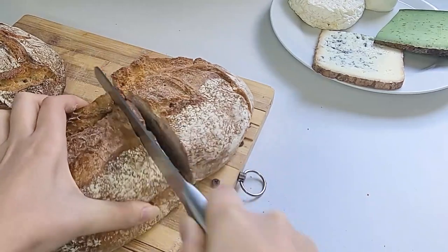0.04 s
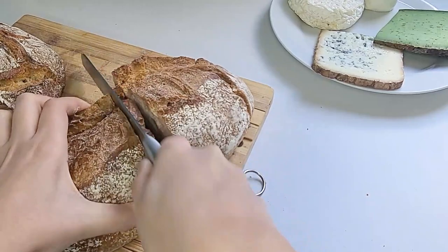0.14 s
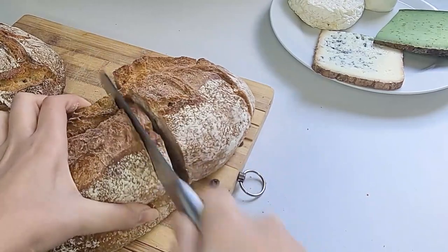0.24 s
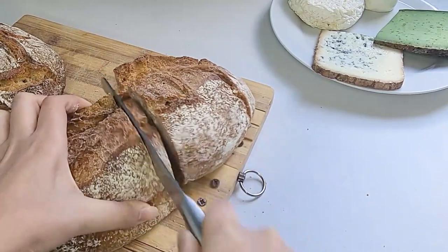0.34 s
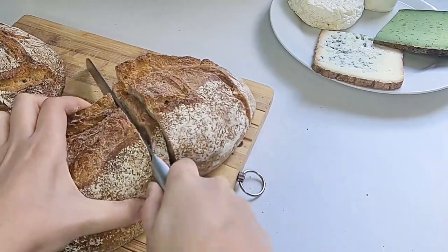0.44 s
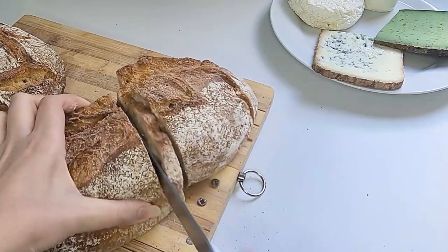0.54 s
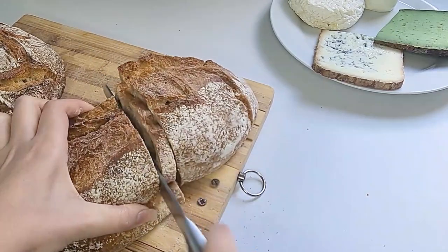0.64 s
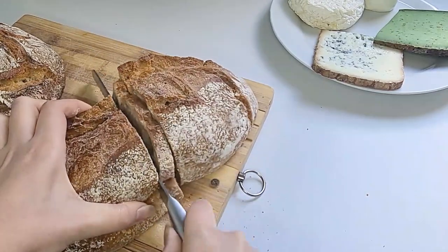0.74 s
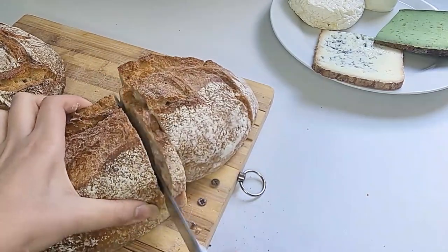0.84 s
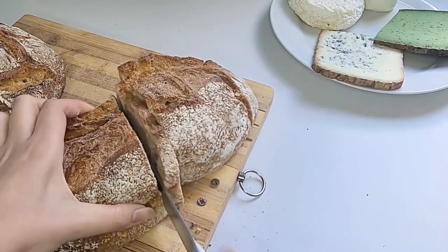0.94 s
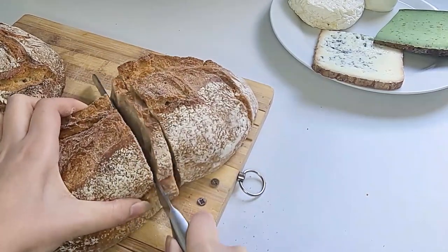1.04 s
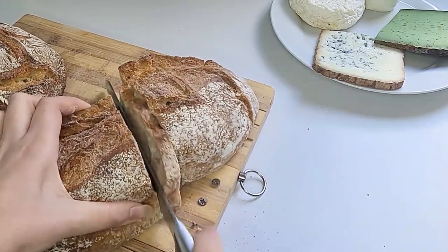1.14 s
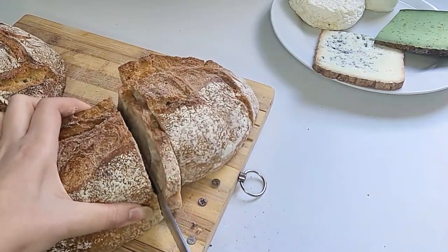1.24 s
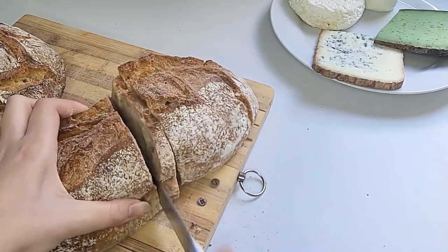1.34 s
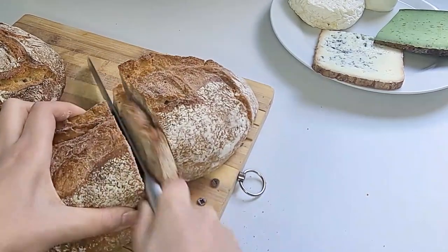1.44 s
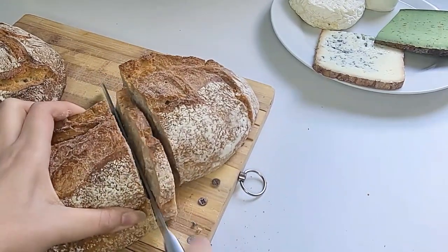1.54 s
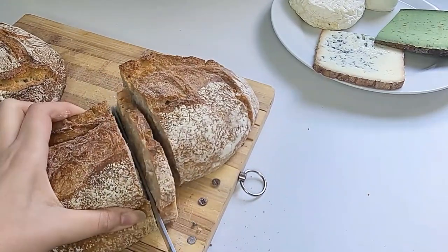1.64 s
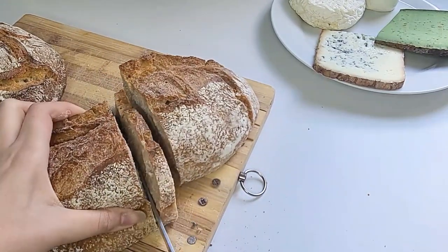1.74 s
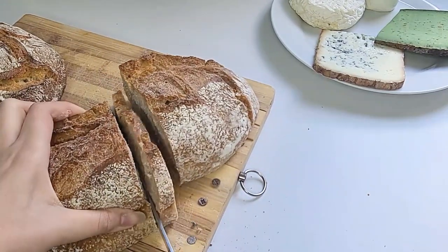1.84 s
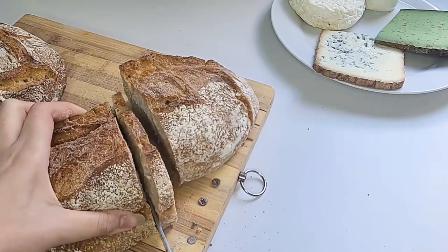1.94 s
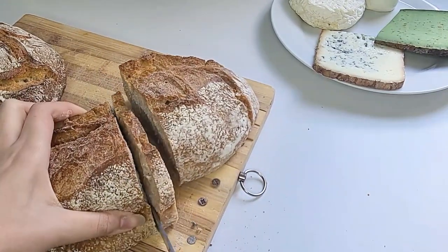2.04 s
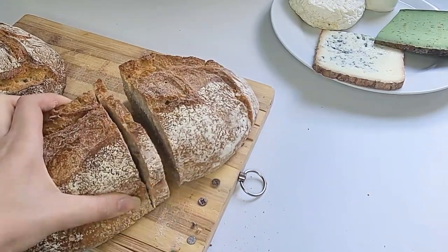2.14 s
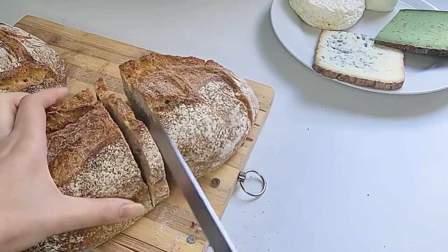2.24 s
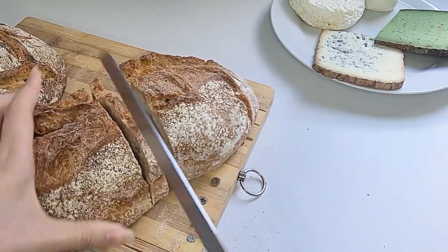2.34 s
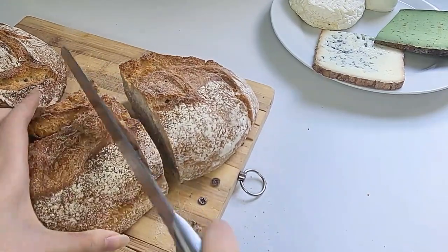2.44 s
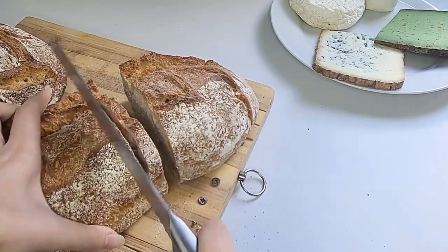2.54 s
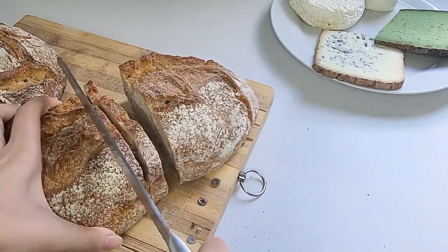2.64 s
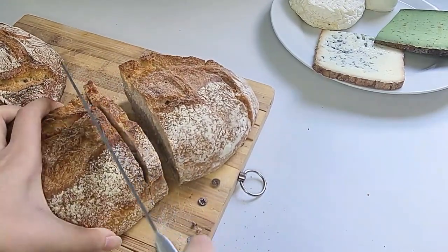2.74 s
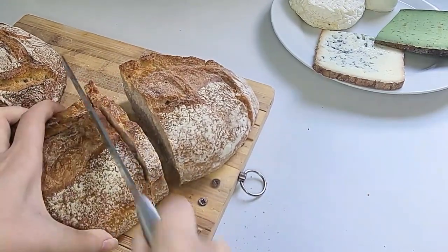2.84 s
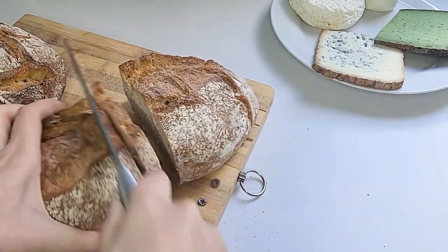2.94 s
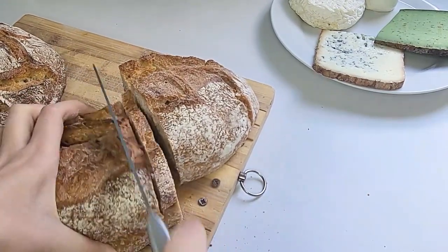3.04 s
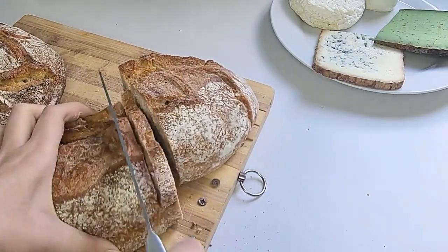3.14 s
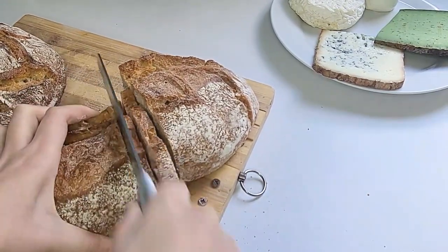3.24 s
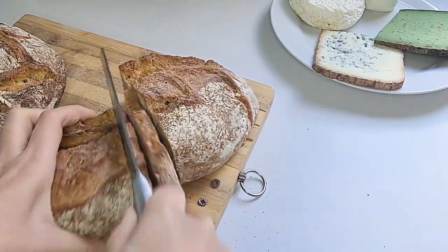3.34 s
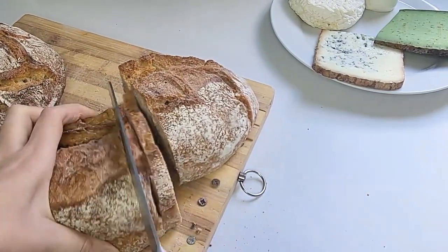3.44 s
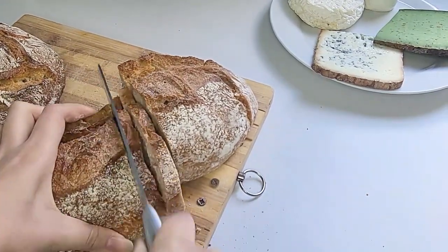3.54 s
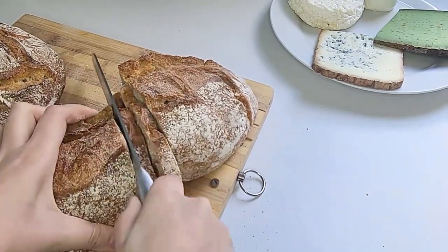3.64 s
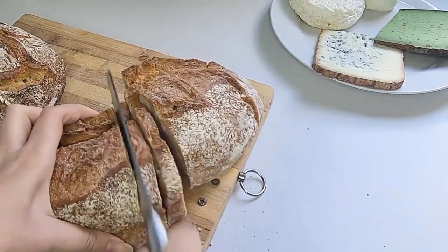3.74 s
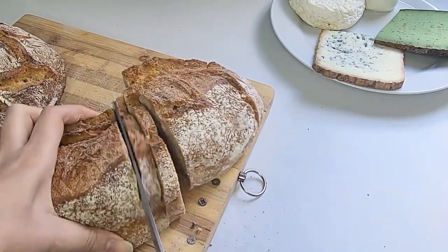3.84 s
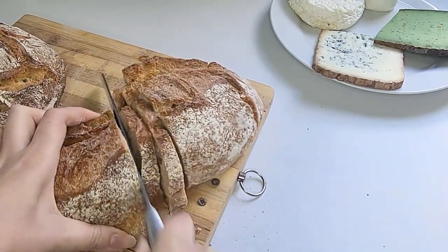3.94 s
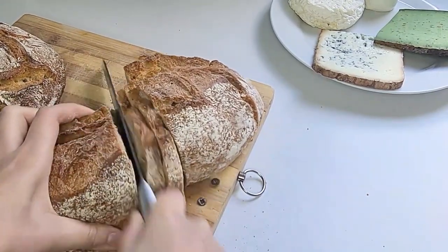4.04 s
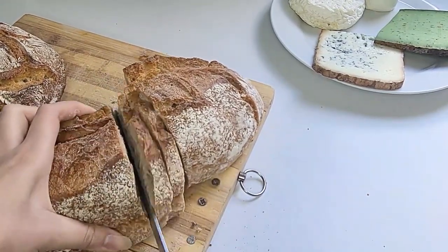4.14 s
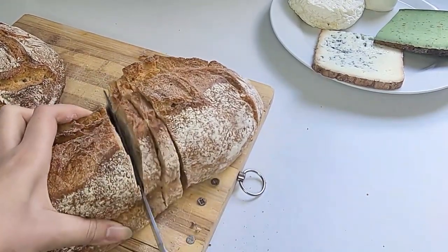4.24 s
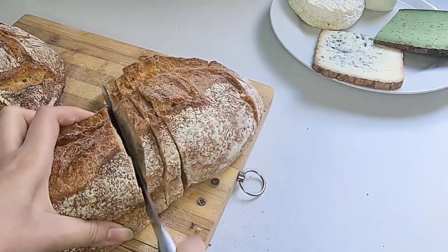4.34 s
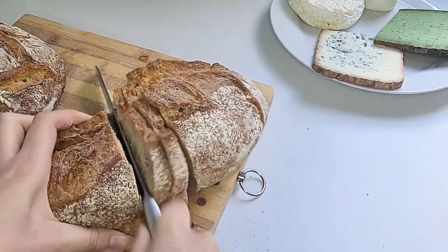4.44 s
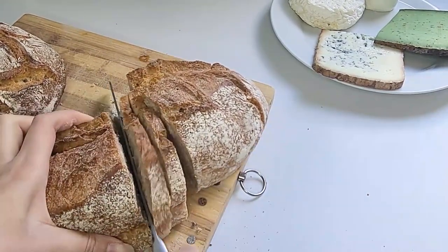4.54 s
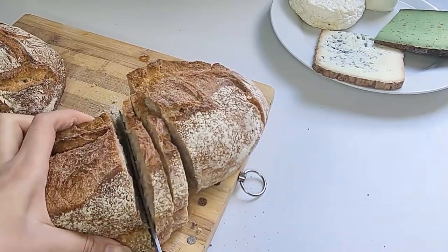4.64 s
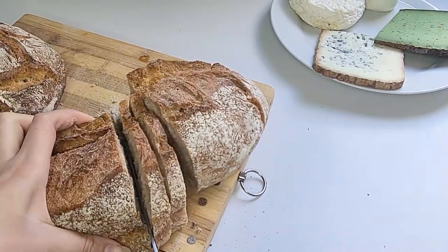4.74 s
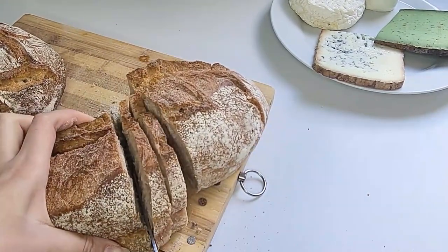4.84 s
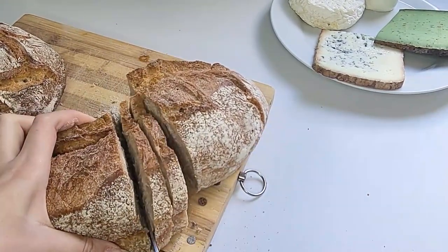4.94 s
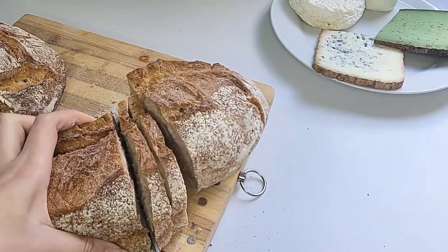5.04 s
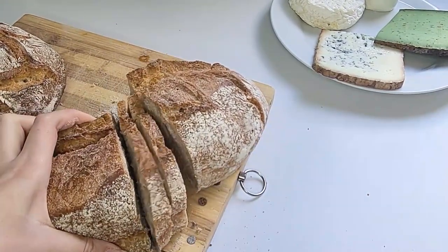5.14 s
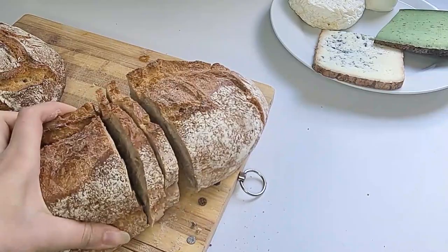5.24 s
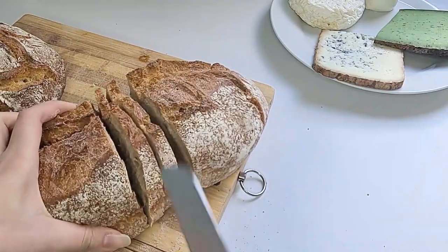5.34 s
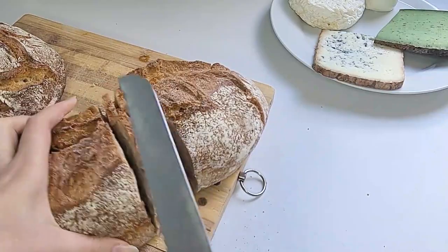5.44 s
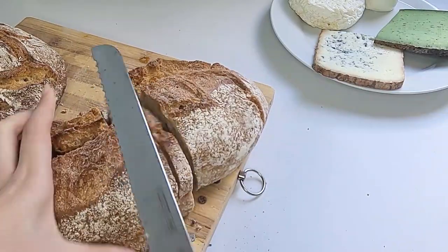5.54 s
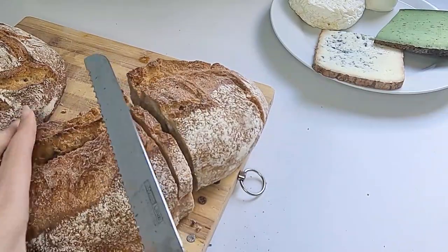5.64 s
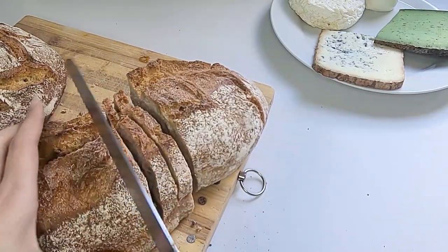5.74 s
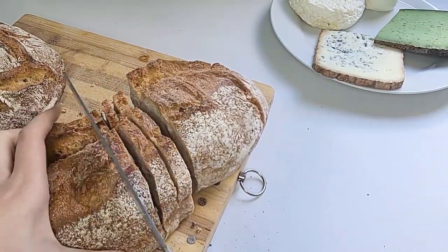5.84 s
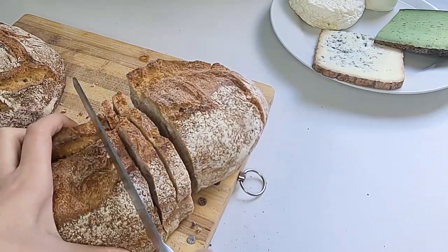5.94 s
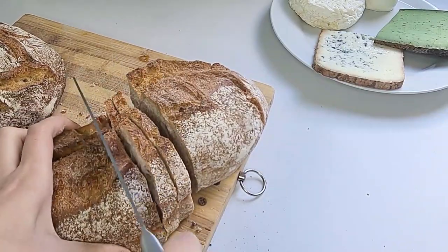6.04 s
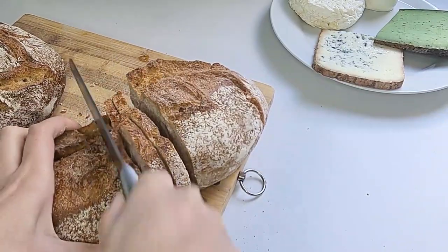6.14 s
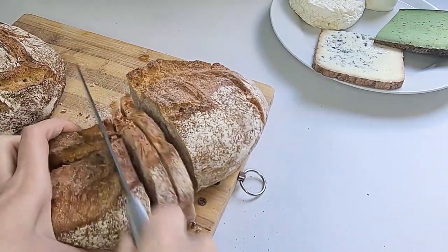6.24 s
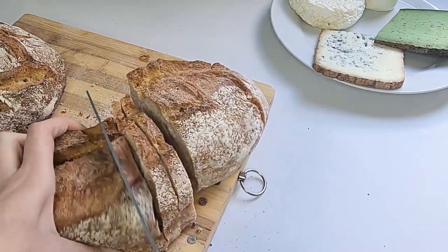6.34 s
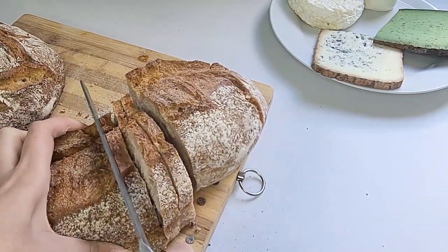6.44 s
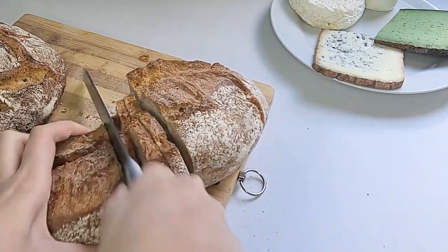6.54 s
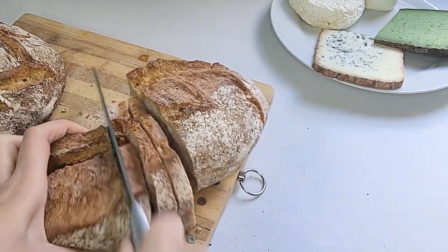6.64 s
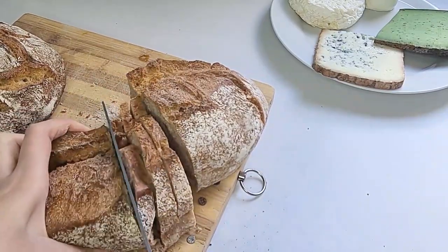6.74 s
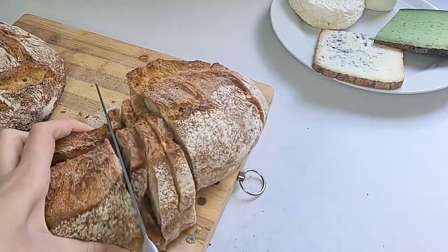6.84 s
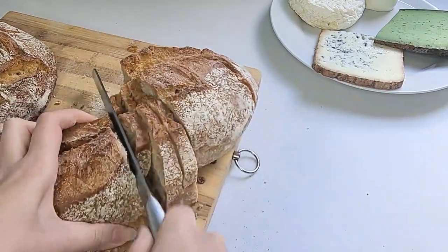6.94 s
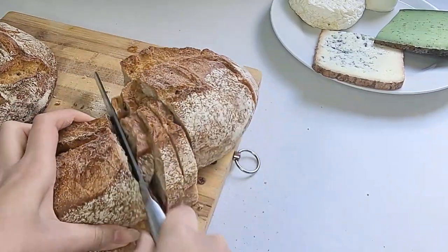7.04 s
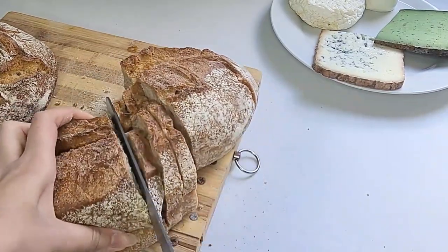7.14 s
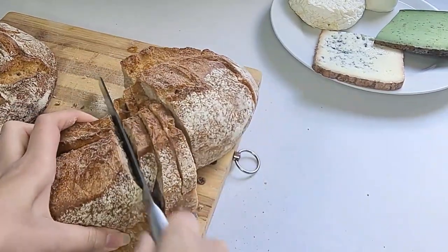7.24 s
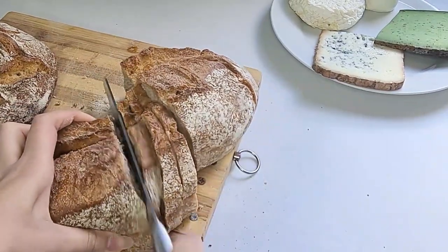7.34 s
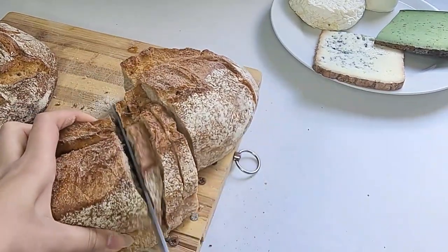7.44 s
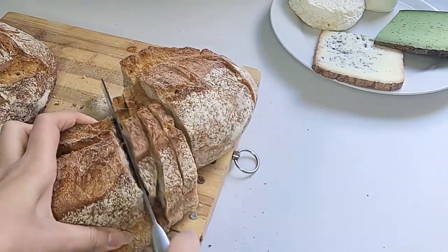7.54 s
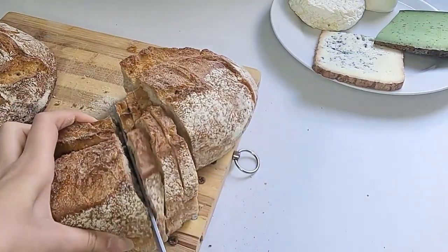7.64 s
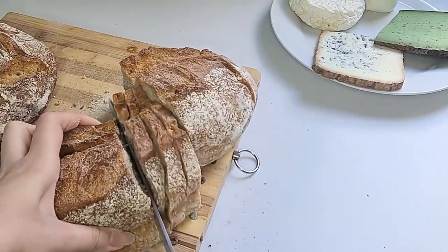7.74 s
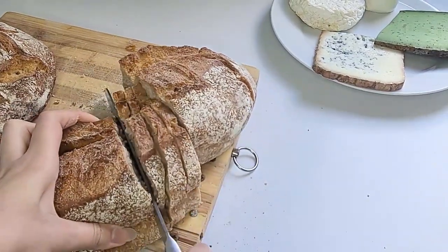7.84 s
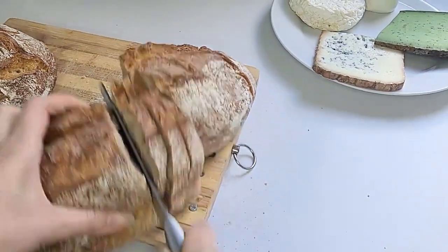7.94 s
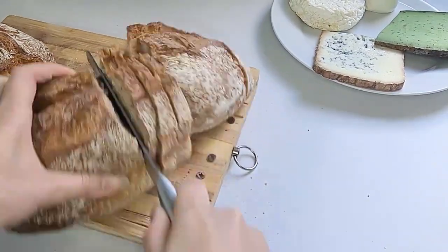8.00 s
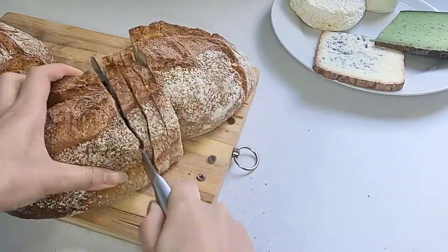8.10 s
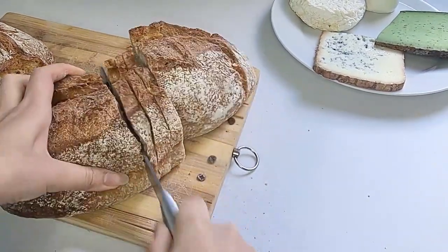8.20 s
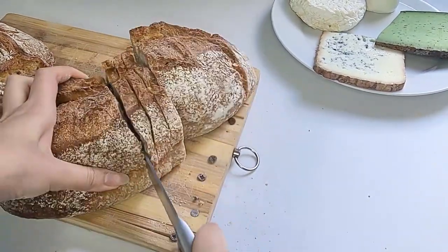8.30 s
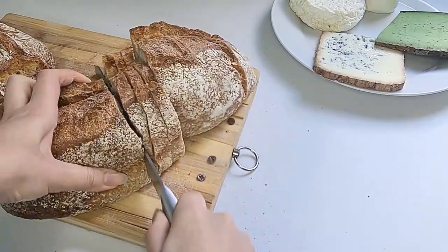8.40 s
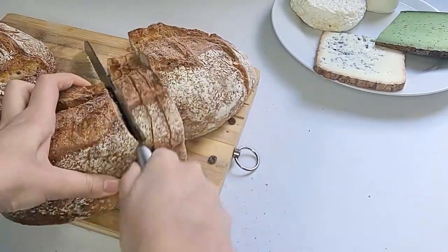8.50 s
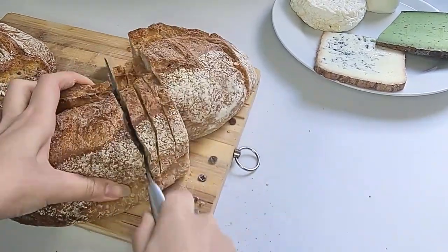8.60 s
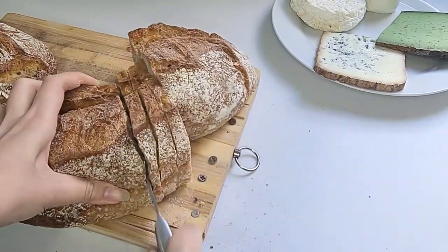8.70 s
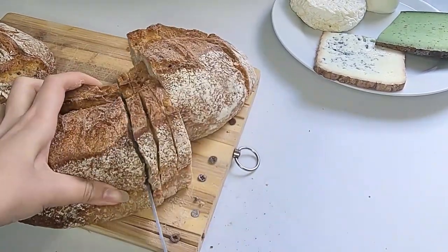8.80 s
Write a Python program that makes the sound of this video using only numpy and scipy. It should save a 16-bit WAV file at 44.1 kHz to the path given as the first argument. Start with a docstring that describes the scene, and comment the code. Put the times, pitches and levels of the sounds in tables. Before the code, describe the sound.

Close up in a quiet kitchen, a serrated knife saws a crusty loaf on a wooden board. Short, dry, crumbly strokes come several per second, with sharp crust cracks and soft low thumps of the worktop. The rasping fades to light rubbing, then restarts. Midway a loud crack and knock come with a brief metallic chatter as the blade breaks free; after a pause, sawing resumes with another woody knock.

```python
"""In a quiet kitchen a serrated knife saws through the crust of a loaf on a wooden board, heard close by.
Each stroke is a burst of crumb snaps: random impulses exciting short resonances, shaped by the force.
Larger crust cracks stand out as decaying noise bursts, and the worktop shakes at a low pitch under the hand.
The board's knocks and the freed blade's rings are sums of decaying modes, over a short reverberant tail
and a room tone of filtered noise."""
import sys
import numpy as np
from scipy import signal
from scipy.fft import rfft, irfft, next_fast_len
from scipy.io import wavfile
from scipy.ndimage import uniform_filter1d

SR = 44100
rng = np.random.default_rng(int(sys.argv[2]) if len(sys.argv) > 2 else 0)


def inscribe(sig):
    """Save sig as 16-bit PCM at rate SR to the path in sys.argv[1].

    A 1-D sig is mono; a 2-D sig holds one channel per row.
    Samples are clipped to [-1, 1] before scaling.
    """
    pcm = np.round(np.clip(np.atleast_2d(sig).T, -1, 1) * 32767)
    wavfile.write(sys.argv[1], SR, pcm.astype(np.int16))


N = 391026

# Crust cracks: t/s, level/dB, ring f/Hz, grit level/dB and treble tick level/dB (both against the crack level)
CRACK_EVENTS = [(0.223, -20.5, 1330, -10.5, -34), (0.516, -22.5, 620, -11, -29),
                (0.541, -19.5, 635, -15, -19), (0.681, -22.5, 730, -19, -13), (0.785, -25, 1590, -37, -40),
                (0.842, -27, 970, -13, -33), (1.518, -21, 980, -30, -35), (1.528, -16, 656, -32, -29),
                (1.541, -16, 1105, -19, -24), (2.973, -31.5, 673, -23, -20), (3.054, -21.5, 708, -11, -16),
                (3.177, -37, 647, -15, -22), (3.289, -19.5, 1870, -6.5, -25), (3.371, -29, 664, 6, -5),
                (3.519, -23, 669, -19, -31), (3.739, -30, 1851, -21, -33), (3.774, -21.5, 1713, -21, -35),
                (4.029, -34, 612, -19, -31), (4.057, -17.5, 658, -41, -36), (4.07, -14.5, 1170, -10, -23),
                (4.083, -44, 1220, -21, -28), (4.1, -20.5, 1094, -5.5, -33), (4.113, -32, 1085, -14, -28),
                (4.125, -18, 760, -33, -35), (4.14, -32, 2292, -17, -35), (4.222, -37.5, 759, 8, -13),
                (4.37, -21, 1270, -5, -30), (4.391, -19.5, 1345, -6.5, -25), (4.491, -37, 645.4, -29, -32),
                (4.776, -32.5, 2912, -24, -41), (5.236, -39.5, 1500, -7.5, -25),
                (5.309, -8.5, 1683, -37, -54), (5.374, -9.5, 3515, -11, -37), (6.187, -38, 765.5, -17, -21),
                (6.143, -53, 2990, 1, -15), (6.204, -35.5, 676, -3, -3.5), (6.375, -47, 790, 9.5, -25),
                (6.398, -33, 774, 1.5, 10.5), (6.458, -42.5, 657, -17, 19), (6.474, -34, 590, -9, 1),
                (6.623, -23, 1858, -12, -40), (6.679, -21.5, 631, -11, -38), (6.699, -14.5, 995, -31, -35),
                (6.71, -22, 1500, -23, -30), (6.799, -25, 1451, -26, -12), (6.887, -42, 2000, -10, 0),
                (6.949, -46, 1988, -2, 0), (7.258, -54, 2500, 8, 15.5), (7.271, -60, 2545, 14, 10),
                (7.385, -41.5, 665, 6, -19), (7.405, -32, 2780, -5, -9), (7.774, -34, 1261, 2, -28),
                (7.863, -31.5, 1261, -10, -33), (7.961, -17.5, 795, 0.5, -3),
                (7.985, -22.5, 1422, -15, -24), (8.075, -36.5, 599, -39, -39.5),
                (8.178, -37.5, 603.6, 0.5, -38), (8.641, -32, 676.6, -4, -29), (8.675, -23, 960, -6, -24)]


def amp(db):
    """Level to amplitude: 20 dB is a factor of ten."""
    return 10 ** (np.asarray(db) / 20)


def evened(x):
    """Normalization to unit root-mean-square."""
    return x / np.sqrt(np.mean(x ** 2) + 1e-20)


def read(points, hz):
    """Interpolation of a spectrum on a logarithmic frequency axis."""
    f, value = np.transpose(points)
    return np.interp(np.log(hz + 1), np.log(f + 1), value)


def curve(rows):
    """Linear interpolation in time: the columns of a table at every sample."""
    s, *columns = np.transpose(rows)
    return [np.interp(np.arange(N) / SR, s, column) for column in columns]


def add(mix, s, sound):
    """Superposition: a sound is added into the mix from time s."""
    part = mix[round(s * SR):][:len(sound)]
    part += sound[:len(part)]


def drift(shape, width):
    """Slow random fluctuation: noise averaged twice over a window of width samples."""
    once = uniform_filter1d(rng.standard_normal(shape), size=width)
    return evened(uniform_filter1d(once, size=width))


def causal(points, size=4096):
    """Minimum-phase response: the Hilbert transform of the log gain gives the phase."""
    hz = abs(np.fft.fftfreq(size, 1 / SR))
    log_gain = np.log(amp(np.maximum(read(points, hz), -100)))
    spectrum = np.exp(np.conj(signal.hilbert(log_gain)))
    return np.fft.ifft(spectrum).real[:size // 2]


def coloured(x, response):
    """Linear filtering by convolution, normalized to unit root-mean-square."""
    return evened(signal.oaconvolve(x, response[None], axes=1)[:, :N])


def ring(hz, t60, length):
    """Free vibration of one damped mode, falling 60 dB in t60 seconds."""
    t = np.arange(round(length * SR)) / SR
    return np.sin(2 * np.pi * hz * t) * amp(-60 * t / t60)


def resonate(x, hz, width):
    """Heterodyne resonance of gain 1: the curve hz is shifted to zero, smoothed, and shifted back."""
    turn = np.exp(2j * np.pi * np.cumsum(hz) / SR)
    pole = np.exp(-np.pi * width / SR)
    smoothed = signal.lfilter([1 - pole], [1, -pole], x / turn)
    return 2 * (turn * smoothed).real


def ears(x, spread_s):
    """Interchannel coherence: one shared direct path, plus short scattered paths separate for each channel."""
    # Left-right likeness: f/Hz, likeness (held within 0 to 1)
    likeness = [(60, 1), (180, 1), (550, 0.8), (1650, 0.0036), (4970, -0.26), (15000, -0.87)]
    size = 2048
    decay = np.exp(-np.arange(size) / (spread_s * SR))
    scatter = rfft(rng.standard_normal((2, size)) * decay)
    scatter /= np.sqrt(uniform_filter1d(abs(scatter) ** 2, size=60, axis=1))
    same = np.clip(read(likeness, np.fft.rfftfreq(size, 1 / SR)), 0, 1)
    paths = irfft(np.sqrt(same) + np.sqrt(1 - same) * scatter)
    lead = size // 8  # room for the part of each response that precedes the direct path
    paths = np.roll(paths, lead, axis=1)
    return signal.oaconvolve(x[None], paths, axes=1)[:, lead:][:, :N]


def struck(hits, modes):
    """Modal superposition: every blow rings all modes, each stronger or weaker by where it lands."""
    mix = np.zeros(N)
    for (s, db), where in zip(hits, rng.uniform(-1.4, 1, (len(hits), len(modes)))):
        sound = sum(amp(mode_db + 3 * w) * ring(hz, t60, .6)
                    for (hz, mode_db, t60), w in zip(modes, where))
        contact = np.minimum(np.arange(len(sound)) / 50, 1)  # builds in about a millisecond
        add(mix, s, amp(db) * sound * contact)
    return .8 * mix + .4 * ears(mix, .0004)


def room_tone():
    """Stationary background noise: rumble and hiss in drifting patches, with faint wavering narrow-band tones."""
    # Spectral shape: f/Hz, relative level per Hz/dB
    tone_spectrum = [(15, -11), (30, -10.5), (60, 6.5), (150, -13), (500, -20.5), (1200, -35),
                     (2500, -44.5), (8300, -52), (9000, -58.5), (16000, -57)]
    # Faint tones: f/Hz, level/dB rms
    whine_tones = [(2514, -84), (8360, -97)]
    room_db, patch_db = -46, 3.5
    frames, hz = N // 512 + 5, np.fft.rfftfreq(2048, 1 / SR)
    a, b, c, d, patches = rng.standard_normal((frames, len(hz), 5)).T
    patches = uniform_filter1d(patches, size=20, axis=0)
    patches = evened(uniform_filter1d(patches, size=8, axis=1))
    same = np.clip(1 / (1 + (hz / 500) ** 2), 0, 1)[:, None]  # channels part above the bass
    left = a + 1j * b
    right = same * left + np.sqrt(1 - same ** 2) * (c + 1j * d)
    frames_lr = np.array([left, right]) * amp(read(tone_spectrum, hz)[:, None] + patch_db * patches)
    noise = evened(signal.istft(frames_lr, nperseg=2048, noverlap=1536)[1][:, :N])
    tones = sum(amp(db) * evened(resonate(rng.standard_normal(N), np.full(N, f), 12))
                for f, db in whine_tones)
    return amp(room_db) * noise + tones


def kitchen(x):
    """Reverberation: a short diffuse tail, duller as it dies because the bright part decays faster."""
    low_t60, bright_t60 = 0.2, 0.042  # s
    t = np.arange(SR // 2) / SR
    noise = rng.standard_normal((2, 2, len(t))) * (t > .004)  # silent for the first 4 ms
    low = signal.lfilter([1], [1, -.8], noise[0]) * amp(-60 * t / low_t60)
    bright = noise[1] * amp(-60 * t / bright_t60)
    tail = evened(low) + .5 * evened(bright)
    return signal.fftconvolve(x, tail / np.linalg.norm(tail[0]), axes=1)[:, :N]


def worktop():
    """Driven low mode: it swells and settles with each shove, pushed unevenly, so it is not a clean sine."""
    # Shoves of the hand: peak t/s, relative level/dB, f/Hz (before wobble)
    hand_shoves = [(0.0, -37.5, 82.2), (0.13, -29, 70.7), (0.28, -29, 67.9), (0.42, -31.5, 69.5),
                   (0.55, -30.5, 67.1), (0.67, -34, 79.8), (1.03, -37, 68.8), (1.16, -36, 62),
                   (1.36, -35.5, 65.55), (1.58, -43.5, 74.8), (1.68, -43.5, 77.7), (1.78, -36, 75.7),
                   (2.27, -42, 61), (3.0, -37, 61.05), (3.06, -31.5, 61.8), (3.21, -35, 67.8),
                   (3.31, -36.5, 63.96), (3.41, -29.5, 61.95), (3.58, -31.5, 63.6), (3.68, -38, 61.3),
                   (3.78, -35.5, 76.04), (3.93, -39, 70.3), (4.1, -21, 66.6), (4.14, -25, 66.96),
                   (4.23, -31, 67.5), (4.58, -39.5, 68.7), (4.79, -37, 68.5), (5.38, -38.5, 66),
                   (5.95, -45.5, 65), (6.24, -32, 80.1), (6.31, -28, 71.9), (6.44, -37, 73.5),
                   (6.54, -41, 69.54), (6.67, -36, 67.7), (6.72, -32.5, 67.5), (6.84, -33.5, 68.85),
                   (7.13, -44.5, 76.9), (7.41, -35.5, 78), (7.57, -39.5, 66.5), (7.65, -35.5, 65),
                   (7.83, -37, 74.03), (7.9, -38.5, 71.94), (8.205, -27, 67), (8.33, -40.5, 63.1),
                   (8.68, -41.5, 65.8), (8.76, -36, 70.2)]
    swell_db_per_s, hold_s, settle_db_per_s, rest_db = 506, 0.015, 325, -67
    level, t = np.full(N, amp(rest_db)), np.arange(N) / SR
    for s, db, _ in hand_shoves:
        at = slice(max(round((s - .15) * SR), 0), round((s + .25) * SR))
        before = np.maximum(s - hold_s / 2 - t[at], 0)
        after = np.maximum(t[at] - s - hold_s / 2, 0)
        shape_db = db - swell_db_per_s * before - settle_db_per_s * after
        level[at] = np.maximum(level[at], amp(shape_db))
    pitch_wobble, level_wobble = drift((2, N), 500)
    turns = np.cumsum(curve(hand_shoves)[1] * (1 + 0.051 * pitch_wobble)) / SR
    octave = amp(-16.5) * np.cos(4 * np.pi * turns + 1)
    swing = np.cos(2 * np.pi * turns) + octave
    return np.sqrt(2) * level * amp(1.2 * level_wobble) * swing


def board():
    """Impact excitation: the blade meets the board, which rings in its modes and rocks as a whole."""
    # Blows: t/s, ring relative level/dB, thud relative level/dB
    board_knocks = np.array([(5.313, -34, -27), (5.374, -15.5, -35), (6.6954, -9, -27), (8.18, -29.5, -46)])
    # Ringing modes of the wood: f/Hz, relative level/dB, t60/s
    wood_modes = [(438, -10, 0.037), (615, -2.5, 0.024), (840, -13.5, 0.041), (1028, -13, 0.039),
                  (1500, -7.5, 0.013)]
    # Rocking of the whole board: f/Hz, relative level/dB, t60/s
    rocking_mode = [(166, 0, 0.086)]
    return struck(board_knocks[:, :2], wood_modes) + struck(board_knocks[:, ::2], rocking_mode)


def blade():
    """Free modal vibration: the freed blade chatters and rings, its level fluttering in the loose contact."""
    # Modes of the steel: f/Hz, relative level/dB, t60/s
    blade_modes = [(1570, -8, .09), (1690, -4, .11), (1880, 0, .12), (2070, -3, .12), (2150, -3, .11),
                   (2330, -4, .1), (2550, -1, .12), (2745, -11, .45), (3220, -9, .08), (3484, 2, .13),
                   (3765, -13, .45), (4630, -11, .13), (5911, -12, .14), (7300, -16, .05), (10200, -28, .1),
                   (11820, -27, .1), (14640, -26, .12)]
    # Chattering contacts: t/s, relative level/dB
    chatter_hits = [(5.372, -34), (5.374, -31), (5.3805, -34), (5.392, -41), (5.399, -42), (5.405, -40),
                    (5.414, -43), (5.426, -45)]
    rattle_db = 3.
    return struck(chatter_hits, blade_modes) * amp(rattle_db * drift(N, 200))


def cracks():
    """Brittle fracture: a sharp noise burst with a crumbling tail, coloured by the piece that broke."""
    # Broad colour of a crack: f/Hz, relative level per Hz/dB
    snap_spectrum = [(1000, -23.5), (2400, 5.5), (4500, -1), (8000, -8.5), (11000, -19.5)]
    # Treble tick: f/Hz, relative level per Hz/dB
    tick_spectrum = [(6000, -12), (9500, -2), (13000, -1), (16000, -5)]
    crack_db_per_s, tail_db, tail_db_per_s = 4995.5, -20, 427
    ring_share, ring_t60_s = 1.2, .009  # the broken piece rings briefly
    mix, t = np.zeros(N), np.arange(4400) / SR
    decay = amp(-crack_db_per_s * t) + amp(tail_db - tail_db_per_s * t)
    envelope = decay * np.minimum(t / .001, 1)
    snap, tick = causal(snap_spectrum), causal(tick_spectrum)
    noises = rng.standard_normal((len(CRACK_EVENTS), len(t)))
    for (s, crack_db, hz, grit_db, tick_db), noise in zip(CRACK_EVENTS, noises):
        burst = noise * envelope
        mid = signal.oaconvolve(burst, snap)[:len(t)]
        high = signal.oaconvolve(burst, tick)[:len(t)]
        body = ring_share * ring(hz, ring_t60_s, len(t) / SR) + resonate(burst, hz + 0 * t, 570)
        sound = 0.73 * body + amp(grit_db) * mid / abs(mid).max() + amp(tick_db) * high / abs(high).max()
        add(mix, s, amp(crack_db) * sound)
    return ears(mix, .001)


def snaps(per_s, spread_db, hiss_db, clump_db, spots_hz, cycles):
    """Poisson-like shot noise: clumped unequal snaps over hiss, each crust spot with its own ring and paths."""
    clumps = amp(clump_db * drift(N, 250))
    happens = rng.random(N) < per_s / SR
    size = amp(spread_db * np.minimum(rng.exponential(1, N), 3)) * happens
    hiss = amp(hiss_db) * rng.standard_normal(N)
    grains = clumps * (evened(size * rng.standard_normal(N)) + hiss)
    spot, mix = rng.integers(0, len(spots_hz), N), 0
    for k, hz in enumerate(spots_hz):
        response = np.diff(ring(hz, cycles / hz, 0.069))  # falls 60 dB in the given cycles
        rung = evened(signal.oaconvolve(grains * (spot == k), response)[:N])
        mix = mix + ears(rung * np.sqrt(hz / 1000), 0.0039)
    return mix


def stroke(start, end, force_db):
    """Force envelope: it builds quickly, arches and sags over the stroke, then fades into a light drag."""
    arch_db, sag_db, rise_db_per_s, fade_db_per_s = 6.5, 1.5, 874, 443.5
    drag_db, drag_db_per_s = -21.5, 120  # the blade still drags lightly as it turns round
    at = np.arange(max(round((start - .12) * SR), 0), min(round((end + .12) * SR), N))
    t = at / SR
    along = np.clip((t - start) / (end - start), 0, 1)
    before, after = np.maximum(start - t, 0), np.maximum(t - end, 0)
    arch = sag_db * (.5 - along) + arch_db * np.sin(np.pi * along)
    cut_db = arch - rise_db_per_s * before - fade_db_per_s * after
    return at, force_db + np.maximum(cut_db, drag_db - drag_db_per_s * (before + after))


def sawing():
    """Amplitude modulation by force: teeth break the crust into low body, hollow ring, grit and treble fizz."""
    # Saw strokes and rubs: start t/s, end t/s, force level/dB, fizz against force level/dB, hollow ring f/Hz
    saw_strokes = [(0.0, 0.017, -53, -11.5, 732), (0.081, 0.141, -46, -15, 710),
                   (0.213, 0.292, -44, -15.5, 1325), (0.368, 0.429, -54.5, -5.5, 680),
                   (0.513, 0.588, -46, -19.5, 710), (0.648, 0.699, -46, -13, 1140),
                   (0.784, 0.854, -44, -30, 1910), (0.973, 1.019, -51.5, -16, 625),
                   (1.096, 1.171, -52, -17.5, 1140), (1.276, 1.384, -57, -15, 710),
                   (1.496, 1.557, -44, -18.5, 870), (1.598, 1.628, -50.5, -19, 1070),
                   (1.686, 1.78, -61, -18, 417), (1.81, 1.854, -59.5, -14.5, 565),
                   (1.868, 2.035, -66, -15.5, 510), (2.081, 2.155, -69.5, -7.5, 457.3),
                   (2.24, 2.272, -47, -17.5, 447), (2.348, 2.508, -71.5, -16, 890),
                   (2.48, 2.589, -65, -27, 1135), (2.62, 2.902, -78.5, -37, 700),
                   (2.985, 3.047, -42.5, -21.5, 713), (3.116, 3.208, -47, -11.5, 620),
                   (3.245, 3.288, -66, -8, 700), (3.352, 3.417, -42, -14, 700),
                   (3.491, 3.57, -50.5, -12.5, 658), (3.638, 3.747, -50, -16.5, 1650),
                   (3.731, 3.778, -49.5, -19, 1890), (3.878, 3.955, -52.5, -11.5, 629),
                   (4.036, 4.135, -42, -28, 1070), (4.215, 4.29, -49.5, -15.5, 796),
                   (4.325, 4.379, -60.5, -18, 900), (4.509, 4.541, -41, -21.5, 699),
                   (4.574, 4.661, -61.5, -16, 570), (4.727, 4.822, -58, -24, 450.6),
                   (4.842, 4.898, -55.5, -15, 466), (4.926, 5.05, -63.5, -12, 464),
                   (5.108, 5.181, -67.5, -11, 414), (5.24, 5.306, -76, -4, 900),
                   (5.549, 5.635, -65.5, -24.5, 1500), (5.946, 5.982, -68, -38, 520),
                   (6.213, 6.312, -44, -18.5, 1022), (6.393, 6.446, -44.5, -18, 667),
                   (6.45, 6.475, -68, 11.5, 812.5), (6.529, 6.565, -58.5, -9, 910),
                   (6.597, 6.708, -51.5, -12, 919), (6.76, 6.86, -54, -11.5, 1345),
                   (7.02, 7.125, -60.5, -9, 462), (7.211, 7.289, -62.5, -10.5, 710),
                   (7.384, 7.401, -49, -15, 546), (7.499, 7.548, -53, -16.5, 1300),
                   (7.621, 7.675, -51.5, -18.5, 451), (7.763, 7.792, -45.5, -21, 1270),
                   (7.869, 7.938, -51, -17, 1140), (8.164, 8.19, -55.5, -33, 590),
                   (8.348, 8.419, -63, -14, 717), (8.43, 8.455, -64.5, -32, 615),
                   (8.496, 8.563, -56, -16, 730), (8.613, 8.656, -42.5, -17.5, 1500),
                   (8.687, 8.758, -59, -21, 970), (8.775, 8.851, -55, -18, 746)]
    # Spectra of the low body, the grit and the fizz: f/Hz, relative level per Hz/dB
    crust_spectrum = [(59, -40.5), (100, 4), (232, -9.5), (654, -11), (1850, -15), (2320, -16.5),
                      (3000, -16.5), (3900, -28.5), (6600, -120)]
    grit_spectrum = [(1200, -64.5), (2500, 2.5), (4500, 3), (8000, -9.5), (10000, -25.5)]
    fizz_spectrum = [(3530, -30), (6000, -7), (8970, -12.5), (15100, -13), (16000, -42.5)]
    rustle_db = -72  # crumbs settling all the while
    grit_offset_db, grit_share = -0.5, 0.61  # grit takes this share of the fizz offset
    crumble_db, crumble_db_per_s = -26.5, 334  # crumbs shed after each crack
    crumble_grit_db, crumble_fizz_db = -13.5, -20.5
    hollow_db, hollow_wander = -7, .3  # wander is the rms of log frequency

    body, grit, fizz = amp(rustle_db + np.array([[0], [-10], [-22]])) * np.ones(N)
    for start, end, force_db, fizz_db, _ in saw_strokes:
        at, now_db = stroke(start, end, force_db)
        body[at] += amp(now_db)
        grit[at] += amp(now_db + grit_offset_db + grit_share * fizz_db)
        fizz[at] += amp(now_db + fizz_db)
    for s, crack_db, *_ in CRACK_EVENTS:
        shed = amp(crack_db + crumble_db - crumble_db_per_s * np.arange(SR // 6) / SR)
        for layer, db in ((body, 0), (grit, crumble_grit_db), (fizz, crumble_fizz_db)):
            add(layer, s, amp(db) * shed)

    tears = snaps(1500, 4.1, -3, 1.97, np.geomspace(150, 5000, 10), 5.)  # coarse breaks
    crumbs = snaps(6000, 3.1, -1.6, 2.5, np.geomspace(1500, 14000, 7), 3.)  # fine breaks
    hollow_hz = curve([(s, row[-1]) for row in saw_strokes for s in row[:2]])[0]
    wandering_hz = hollow_hz * np.exp(hollow_wander * drift(N, 600))
    hollow = evened(resonate(tears, wandering_hz, 257))
    low = coloured(tears, causal(crust_spectrum)) + amp(hollow_db) * hollow
    mid = coloured(evened(tears) + 1.46 * evened(crumbs), causal(grit_spectrum))
    high = coloured(crumbs, causal(fizz_spectrum))
    return body * low + grit * mid + fizz * high


def scene():
    """Superposition of the near sources, their reverberation, the worktop and the room tone."""
    near = sawing() + cracks() + board() + blade()
    return near + amp(-18.5) * kitchen(near) + worktop() + room_tone()


def record(dry):
    """Interchannel level difference: left is a little louder, most in the treble; then a low-pass band limit."""
    # Lean to the left: f/Hz, left over right level/dB
    left_lean = [(60, 1.6), (1000, 1.3), (6000, 2.), (15000, 4.5)]
    edge_hz = 15800
    size = next_fast_len(N)
    lean = read(left_lean, np.fft.rfftfreq(size, 1 / SR)) / 2
    tilted = irfft(rfft(dry, size) * amp([lean, -lean]), size)[:, :N]
    low_pass = signal.firwin(511, edge_hz, window=("kaiser", 9), fs=SR)
    return signal.oaconvolve(tilted, low_pass[None], "same")


dry = scene()
out = record(dry)
inscribe(out)
```